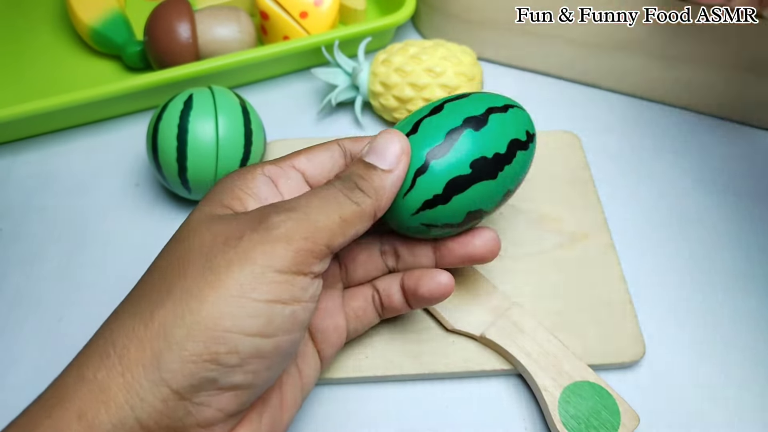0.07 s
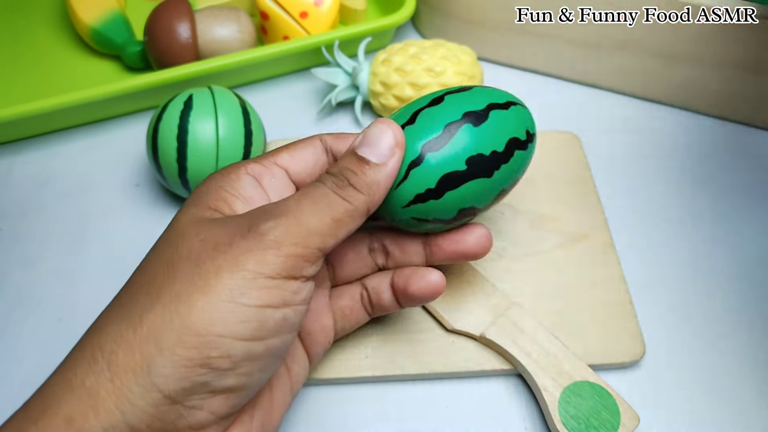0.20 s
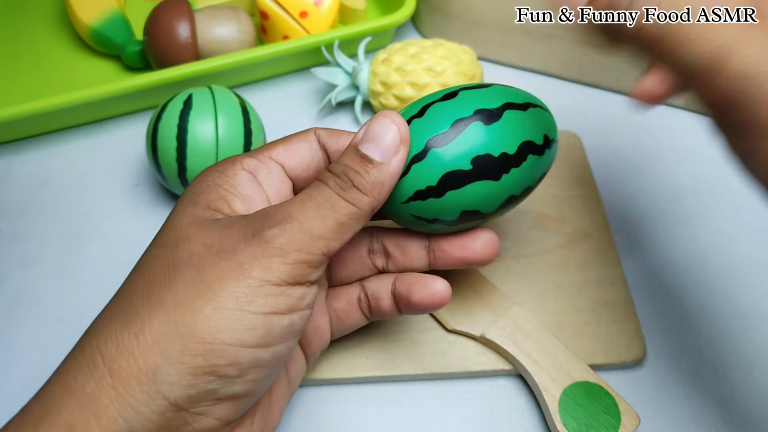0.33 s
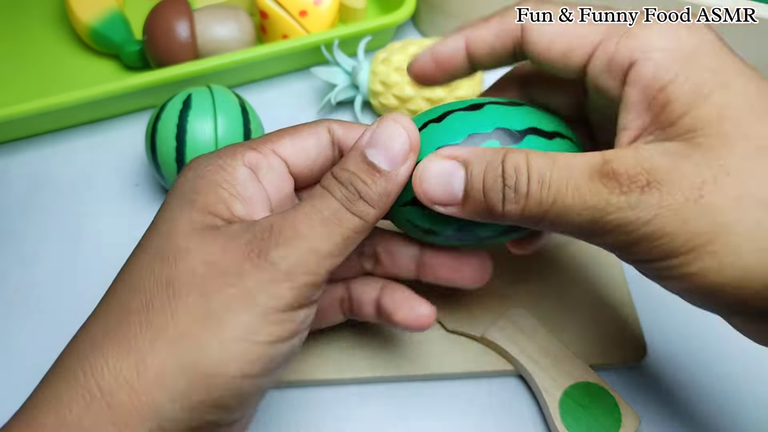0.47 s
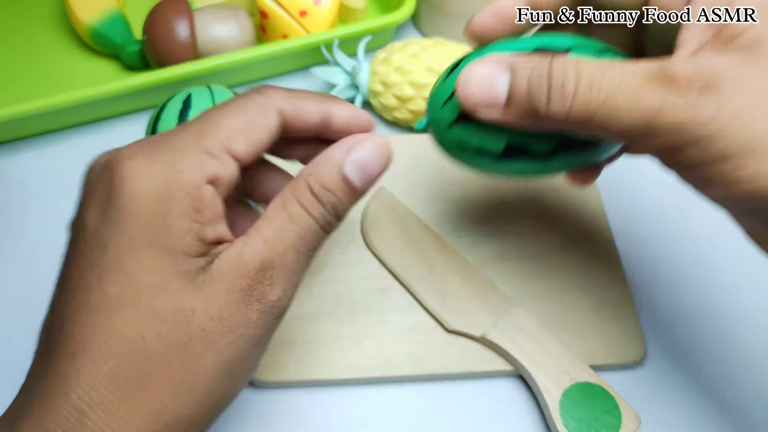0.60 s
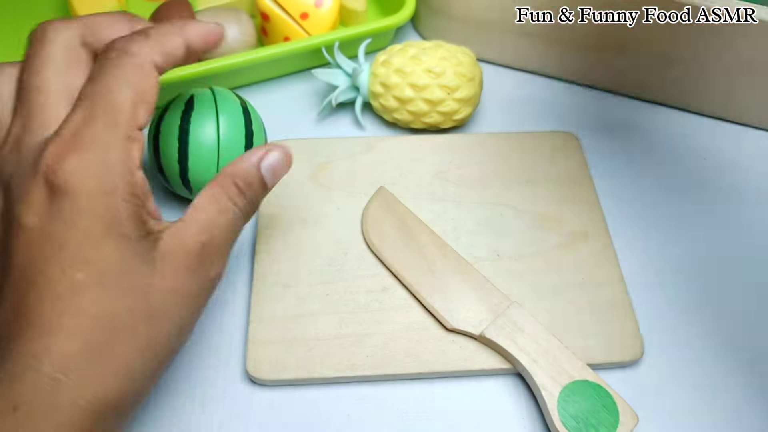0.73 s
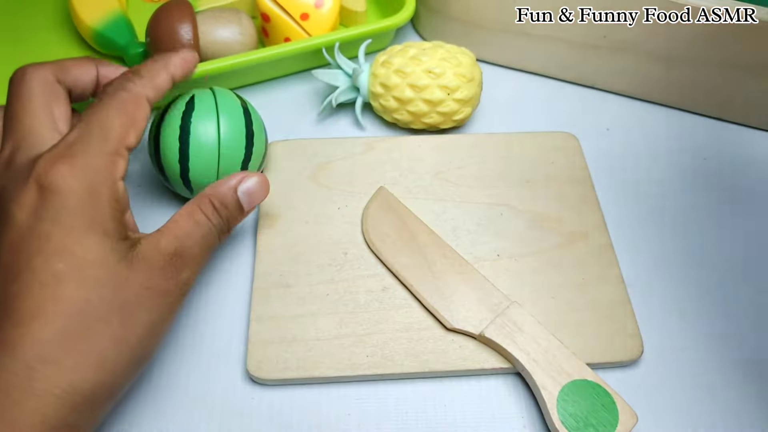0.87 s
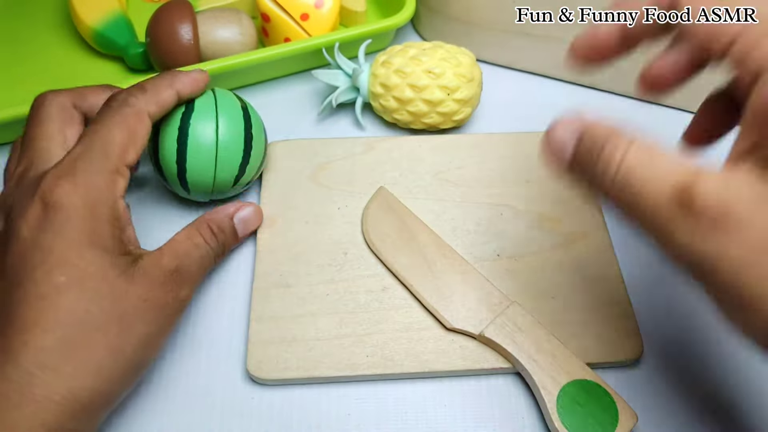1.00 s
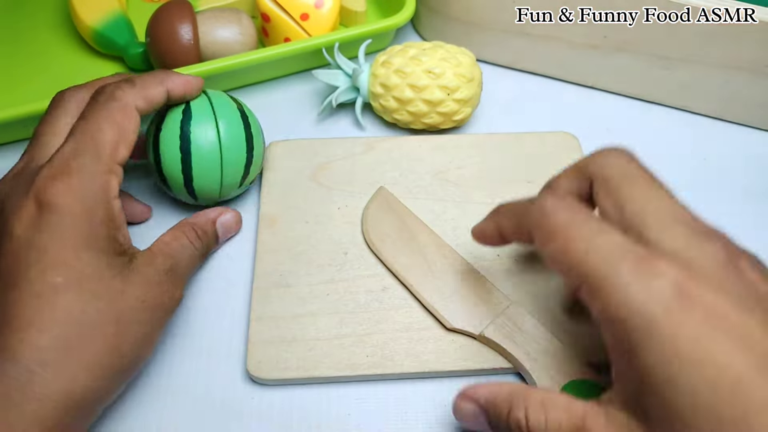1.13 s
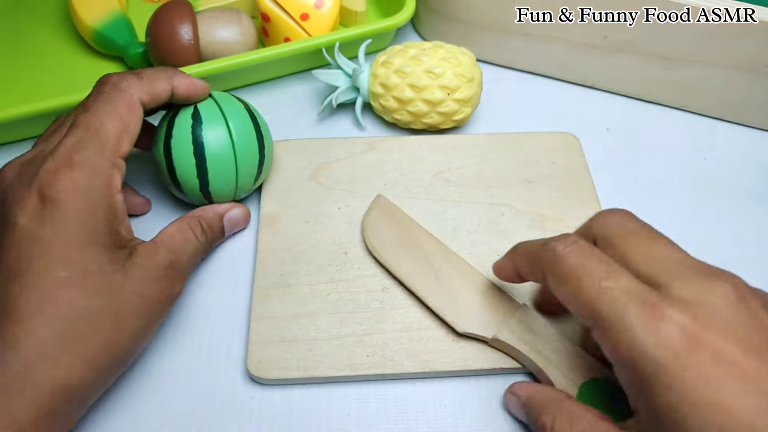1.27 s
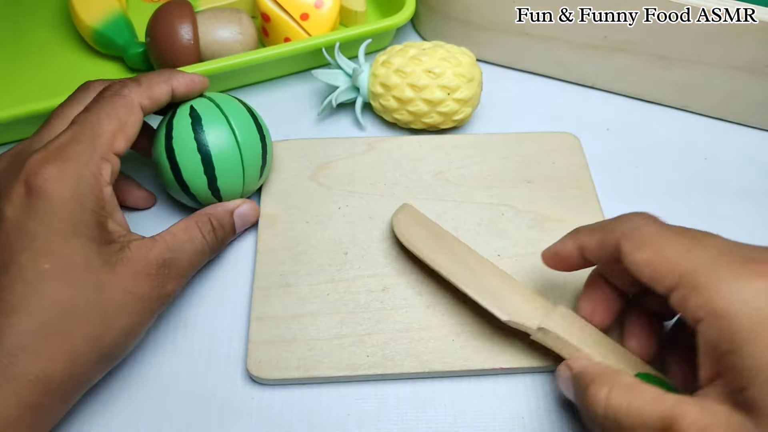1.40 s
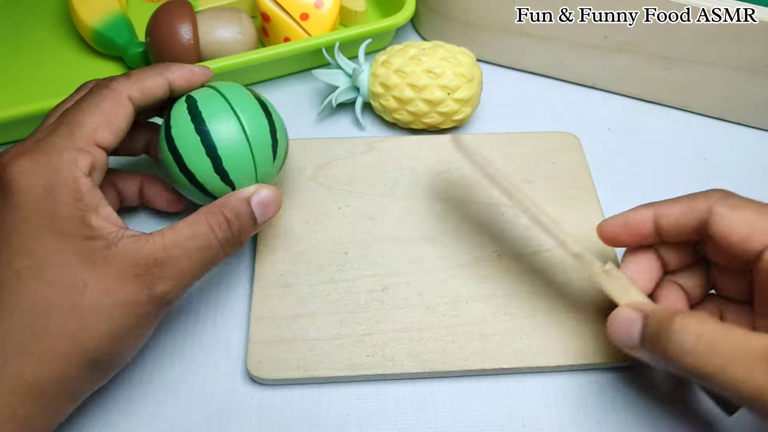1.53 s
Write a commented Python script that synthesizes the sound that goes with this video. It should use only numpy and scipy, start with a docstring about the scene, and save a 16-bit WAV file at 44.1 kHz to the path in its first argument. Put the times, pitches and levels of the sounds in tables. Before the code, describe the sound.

Hard hollow toy pieces clack and rattle on a thin wooden board, close up indoors

```python
"""Hard hollow toy pieces and a wooden toy knife clack on a thin board lying on a table, heard close up indoors.
Each blow is impulsive excitation of damped modes: pieces, board, and table or knife ring at their own pitches.
Between blows the pieces rattle and slide: dense random impacts excite the same modes, under a rustle of skin.
A small room answers each blow with decaying noise; shaped noise gives a low rumble and faint hiss."""
import sys
import numpy as np
from scipy import signal
from scipy.fft import rfft, irfft, next_fast_len
from scipy.io import wavfile
from scipy.ndimage import uniform_filter1d, minimum_filter1d

SR = 44100
rng = np.random.default_rng(int(sys.argv[2]) if len(sys.argv) > 2 else 0)


def pcm_store(signal):
    """Save signal as 16-bit PCM."""
    levels = np.round(np.clip(np.atleast_2d(signal), -1, 1) * 32767)
    wavfile.write(sys.argv[1], SR, levels.astype(np.int16).T)


def natural_amplitude(level_db):
    """Convert a level in decibels to a linear amplitude factor, elementwise."""
    exponent = np.asarray(level_db, float) / 20
    return 10 ** exponent


N = 70560  # length [samples]

# modes of a hollow piece: (multiple of its pitch [1], level [dB], t60 [s])
PIECE = [(.83, -13.5, 0.046), (.92, 2, 0.014), (1, 4.5, 0.022)]
# modes of the thin board: (multiple of its pitch [1], level [dB], t60 [s])
BOARD = [(.9, -29, 0.065), (1, 1.5, 0.049), (1.08, -1.5, 0.034)]
# dull thump of the table under the pieces: (frequency [Hz], level [dB], t60 [s])
TABLE = [(167.6, -9.5, 0.21), (325, 2.5, 0.05), (440, 18.5, 0.011), (528, -1.5, 0.04)]
# noise spectrum of hard contact: (frequency [Hz], relative density [dB])
CRACK = [(400, -18.5), (2500, 1.5), (7000, -18.5), (12000, -25.5), (16000, -40)]
MODE_SCATTER_DB, DETUNE = 2, 0.05  # standard deviations: level [dB], relative pitch [1]
BOARD_ATTACK_S = .0018  # time constant of the rise [s]


def unit(x):
    """Normalization to root-mean-square 1."""
    return x / np.sqrt(np.mean(x ** 2) + 1e-20)


def along(points, hz):
    """Linear interpolation of (frequency [Hz], value) points on a logarithmic frequency axis."""
    f, v = np.transpose(points)
    return np.interp(np.log(hz + 1), np.log(f + 1), v)


def filtered(x, response):
    """Linear filtering: the spectrum of x times a complex response of frequency."""
    m = next_fast_len(x.shape[-1] + 8192)
    return irfft(rfft(x, m) * response(np.fft.rfftfreq(m, 1 / SR)), m)[..., :x.shape[-1]]


def shaped(x, points):
    """Spectral shaping by a magnitude curve of (frequency [Hz], level [dB]) points."""
    return filtered(x, lambda hz: natural_amplitude(along(points, hz)))


def ring(modes, scale, scatter_db, detune=0., attack_s=0.00042):
    """Modal superposition: damped sines at both ears, with chance offsets of level, pitch and phase."""
    spread_rad_per_khz = .5  # standard deviation of the phase difference between the ears
    hz, db, t60 = np.transpose(modes)[:, :, None]
    t = np.arange(SR // 6) / SR
    luck = rng.standard_normal((3,) + db.shape)
    hz = hz * scale * (1 + detune * luck[0])
    level = natural_amplitude(db + scatter_db * luck[1] - 60 * t / t60)
    skew = spread_rad_per_khz * hz / 1000 * luck[2]
    ears = [(level * np.sin(2 * np.pi * hz * t + side * skew)).sum(0) for side in (.5, -.5)]
    return np.array(ears) * (1 - np.exp(-t / attack_s))


def clack(piece_db, hz, click_db, contact_s):
    """Impact excitation: a piece rings while a bright crack chatters in repeated tiny contacts."""
    # upper modes: (frequency [Hz], level [dB], t60 [s])
    bright_modes = [(2950, -3, 0.011), (3964, -13, 0.016)]
    bright_scatter_db = 3
    crack_alike = .72  # correlation factor of the noise at the two ears
    crack_db, crack_t60_s = 9, 0.015
    chatter_db, touches = -10, 9

    t = np.arange(SR // 6) / SR
    both, *own = rng.standard_normal((3, len(t)))
    noise = crack_alike * both + np.sqrt(1 - crack_alike ** 2) * np.array(own)
    crack = unit(shaped(noise, CRACK)) * natural_amplitude(crack_db - 60 * t / crack_t60_s)
    crack = crack * (1 - np.exp(-2 * t / contact_s))

    # one full contact at the start, weaker ones within twice the contact time
    chatter = np.zeros(SR // 40)
    places = (rng.random(size=touches) * 2 * contact_s * SR).astype(int)
    chatter[places] = natural_amplitude(chatter_db) * rng.standard_normal(size=touches)
    chatter[0] = 1

    click = ring(bright_modes, 1, bright_scatter_db, DETUNE) + crack
    click = signal.fftconvolve(click, chatter[None], axes=1)[:, :len(t)]
    shell = ring(PIECE, hz, MODE_SCATTER_DB, attack_s=contact_s)
    return natural_amplitude(piece_db) * shell + natural_amplitude(click_db) * click


def hollow_pieces():
    """Shell resonance: each hard contact sets a hollow piece ringing at its own pitch."""
    # (time [s], ring level [dB], pitch [Hz], bright click level [dB], contact time [s])
    clacks = [(0.2059, -5, 1938, -21.5, 0.00072), (0.2238, -8.5, 1940, -81.5, 0.003),
              (0.3613, -6, 1940, -14.5, 0.0011), (0.416, 4, 2031, -11.5, 0.0024),
              (0.4632, -2, 1982, -19.5, 0.0011), (0.4937, -0.5, 1993, -26.5, 0.0027),
              (0.5138, -6, 1963, -35, 0.0014), (0.546, -17.5, 1940, -36.5, .002),
              (0.5869, -6.5, 2040, -20.5, 0.0013), (0.6193, -2, 1901, -14, 0.0057),
              (0.6299, -5, 1940, -18.5, 0.0017), (.773, -27, 2180, -37, 0.0092),
              (.861, -38.5, 2140, -41.5, 0.0096), (0.9246, -6, 2109, -8, 0.001),
              (.9295, -4, 2107, -25, 0.00074), (0.9609, 2.5, 1973, -17, 0.0014),
              (0.984, -35, 1750, -22.5, 0.0021), (1.02, -4.5, 1984, -23, 0.0012),
              (1.0367, 0.5, 2150, -16, 0.0027), (1.0897, -9, 1896, -32, 0.0029),
              (1.1, -10, 1803, -20.5, 0.0013), (1.1188, -5, 1730, -22, 0.0024),
              (1.1503, -19, 1865, -25, 0.004), (1.218, 2, 2046, -12, 0.0029),
              (1.2995, -16, 2150, -29, 0.0026), (1.33, -7.5, 1549, -24.5, 0.003)]
    out = np.zeros((2, N + SR))
    for s, piece_db, hz, click_db, contact_s in clacks:
        add(out, s, clack(piece_db, hz, click_db, contact_s))
    return out[:, :N]


def board_knocks():
    """Coupled resonance: a blow rings the board with the table or, later, the knife lying on it."""
    # (time [s], board level [dB], pitch [Hz], table or knife level [dB])
    blows = [(.207, -13, 859.4, -39.5), (.225, -13, 852, -70), (.3115, -12, 770, -30.5),
             (.3618, -11, 830, -28), (0.4178, -9, 831, -24.5), (.4625, -9, 758, -24.5),
             (.4775, -14, 743, -24), (.493, -14.5, 857, -54), (.545, -14, 786, -33),
             (.5875, -14.5, 857, -36), (.619, -12.5, 840, -48), (.631, -15, 881, -38.5),
             (.925, -22, 830, -39), (.937, -17.5, 824, -41), (0.961, -18.5, 878, -35.5),
             (.983, -10.5, 830, -32), (1.0989, -6.5, 835, -19.5), (1.12, -23.5, 834, -36),
             (1.1495, -14.5, 830, -23.5), (1.162, -27, 910, -60), (1.1862, -13.5, 830, -33.5),
             (1.2085, -16.5, 885, -30.5), (1.2997, -10.5, 830, -29), (1.3175, -15.5, 860, -26)]
    # the loose wooden knife: (frequency before scaling [Hz], level [dB], t60 [s])
    knife_modes = [(272.6, 1, 0.11), (503, -2.2, 0.087), (723.7, 1.5, 0.13), (1000, 16, 0.013),
                   (1339, 5.5, 0.062)]
    knife_scale, knife_from_s = 0.99, .97

    out = np.zeros((2, N + SR))
    for s, board_db, hz, under_db in blows:
        board = ring(BOARD, hz, MODE_SCATTER_DB, attack_s=BOARD_ATTACK_S)
        if s < knife_from_s:
            under = ring(TABLE, 1, MODE_SCATTER_DB, DETUNE)
        else:
            under = ring(knife_modes, knife_scale, MODE_SCATTER_DB)
        add(out, s, natural_amplitude(board_db) * board + natural_amplitude(under_db) * under)
    return out[:, :N]


def pings():
    """Selective excitation: some touches wake one clear mode of the shell or board."""
    # (time [s], level [dB], frequency [Hz], t60 [s])
    touches = [(0.171, -24.5, 865, 0.1), (0.464, -16.5, 3890, 0.078), (.494, -19.5, 3915, 0.079),
               (1.221, -11.5, 3766, 0.053)]
    out = np.zeros((2, N + SR))
    for s, db, hz, t60 in touches:
        add(out, s, ring([(hz, db, t60)], 1, MODE_SCATTER_DB, attack_s=BOARD_ATTACK_S))
    return out[:, :N]


def taps():
    """Random point process: sparse impulses of uneven size, independent at two channels."""
    per_s, spread_db = 1500, 2
    hits = rng.random((2, N)) < per_s / SR
    size_db = spread_db * rng.standard_normal((2, N))
    return hits * rng.standard_normal((2, N)) * natural_amplitude(size_db)


def rattle():
    """Stochastic excitation: dense tiny contacts drive the same bodies, and skin rustles over them."""
    # (time [s], piece level [dB], board level [dB], fine rustle of skin level [dB])
    levels = [(.14, -62.5, -71, -64), (.3, -45, -38.5, -49.5), (0.401, -29.5, -31.5, -46),
              (.55, -36, -34.5, -66), (0.661, -29.5, -42, -47.5), (0.739, -54.5, -82, -68),
              (0.848, -80.5, -76, -62.5), (0.907, -66.5, -72, -52), (0.922, -30.5, -33, -52),
              (1.129, -29.5, -34.5, -51), (1.26, -37.5, -43.5, -51), (1.36, -35.5, -84, -61),
              (1.47, -67.5, -86, -50.5), (1.53, -82.5, -69, -70)]
    # rustle spectrum: (frequency [Hz], relative density [dB])
    rustle_spectrum = [(2000, -1), (8000, -8), (16000, -20.5)]
    piece_hz, board_hz = 1940, 830
    bright_db, table_db = -3.5, -4  # relative to piece and to board
    alike = .7  # correlation between the ears

    s, *columns = np.transpose(levels)
    piece_db, board_db, rustle_db = [np.interp(np.arange(N) / SR, s, c) for c in columns]
    out = np.zeros((2, N))
    turn = np.arccos(alike) / 2
    bodies = [(PIECE, piece_hz, piece_db), (BOARD, board_hz, board_db), (TABLE, 1, board_db + table_db)]
    for modes, scale, level_db in bodies:
        body = signal.fftconvolve(taps(), ring(modes, scale, 0), axes=1)[:, :N]
        mid, side = unit(body) * natural_amplitude(level_db)
        out += [np.cos(turn) * mid + np.sin(turn) * side, np.cos(turn) * mid - np.sin(turn) * side]
    out += natural_amplitude(piece_db + bright_db) * unit(shaped(taps(), CRACK))

    # the local density of taps, over a small floor, modulates the rustling noise
    grain = uniform_filter1d(np.abs(taps()[:1]), size=700, axis=1) + 0.0033
    rustle = shaped(grain * rng.standard_normal((2, N)), rustle_spectrum)
    return out + natural_amplitude(rustle_db) * unit(rustle)


def room(x):
    """Reverberation: noise whose frequencies each decay at their own rate, independent at each ear."""
    # (frequency [Hz], t60 [s])
    decay = [(150, 0.22), (2000, 0.21), (12000, 0.17)]
    room_db, delay_s = -9, .006
    hz, t, z = signal.stft(rng.standard_normal((2, SR // 2)), SR, nperseg=256)
    tail = signal.istft(z * natural_amplitude(-60 * t / along(decay, hz)[:, None]), SR, nperseg=256)[1]
    tail = np.pad(tail, ((0, 0), (round(delay_s * SR), 0))) / np.linalg.norm(tail[0])
    return natural_amplitude(room_db) * signal.fftconvolve(x[None], tail, axes=1)


def add(out, s, blow):
    """Superposition of one blow and its own room tail at time s [s]."""
    sound = room(blow.mean(0))
    sound[:, :blow.shape[1]] += blow
    out[:, round(s * SR):][:, :sound.shape[1]] += sound


def air():
    """Partially correlated shaped noise: low rumble and room hiss, swelling and sagging together."""
    # (frequency [Hz], relative density [dB])
    spectrum = [(20, 8), (81, 4.5), (142, -17.5), (319, -14.5), (660, -32), (897, -43.5), (1860, -25.5),
                (16000, -59)]
    # (time [s], gain [dB])
    swell = [(0, 1), (.17, 4.5), (0.399, -6), (0.802, 4), (0.929, 2), (1.129, -22), (1.27, 8), (1.551, 2)]
    # correlation between the ears: (frequency [Hz], correlation [1])
    alike = [(300, .87), (4000, .4)]
    air_db = -49  # before the swell

    def mid_side(hz):
        turn = np.arccos(along(alike, hz)) / 2
        return natural_amplitude(along(spectrum, hz)) * [np.cos(turn), np.sin(turn)]

    mid, side = filtered(rng.standard_normal((2, N)), mid_side)
    swell_db = np.interp(np.arange(N) / SR, *np.transpose(swell))
    return natural_amplitude(air_db + swell_db) * unit(np.array([mid + side, mid - side]))


def scene():
    """Superposition of high-passed blows and rattle with the room air."""
    low_cut_hz = 150
    contacts = hollow_pieces() + board_knocks() + pings() + rattle()
    return filtered(contacts, lambda hz: (1j * hz / (low_cut_hz + 1j * hz)) ** 2) + air()


def top_cut(x):
    """Nothing passes above the cut-off."""
    return signal.sosfilt(signal.butter(12, 16830, fs=SR, output="sos"), x)


def record(dry):
    """Two microphone ports differ in arrival time and treble; a fast limiter lowers gain at the peaks."""
    # (frequency [Hz], left over right [dB])
    treble_tilt = [(60, 0), (2000, 1.5), (12000, -2.5)]
    lead_s = .00002  # left ahead of right
    top, hold_s = 1.05, .003  # limiter threshold [amplitude], hold [s]

    side = np.array([[.5], [-.5]])
    x = filtered(dry, lambda hz: natural_amplitude(side * along(treble_tilt, hz)) * np.exp(2j * np.pi * hz * lead_s * side))
    hold = round(hold_s * SR)
    gain = top / np.maximum(np.abs(x).max(0), top)
    gain = uniform_filter1d(minimum_filter1d(gain, size=hold), size=hold)
    return top_cut(np.clip(x * gain, -1, 1))


dry = scene()
out = record(dry)
pcm_store(out)
```